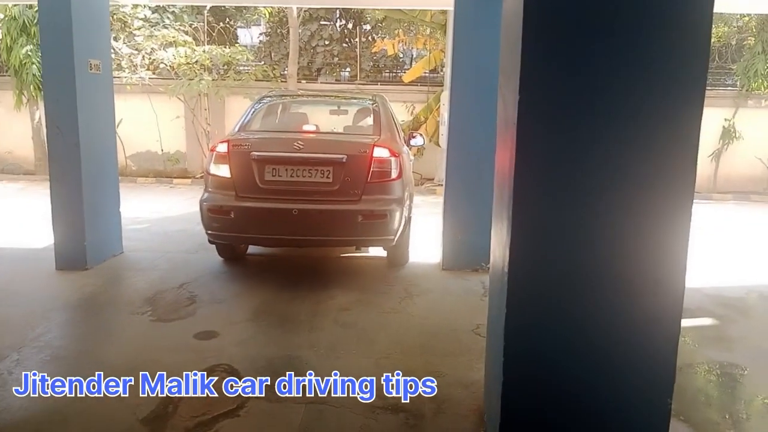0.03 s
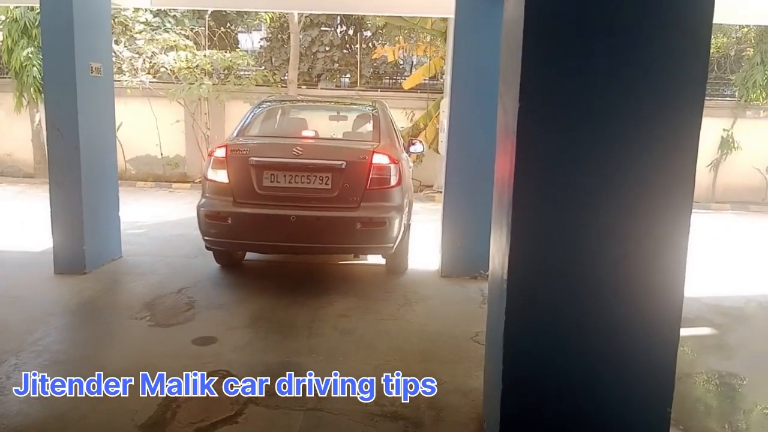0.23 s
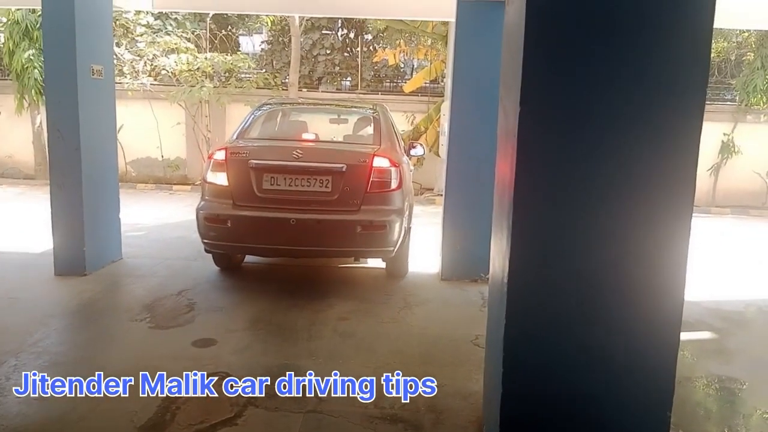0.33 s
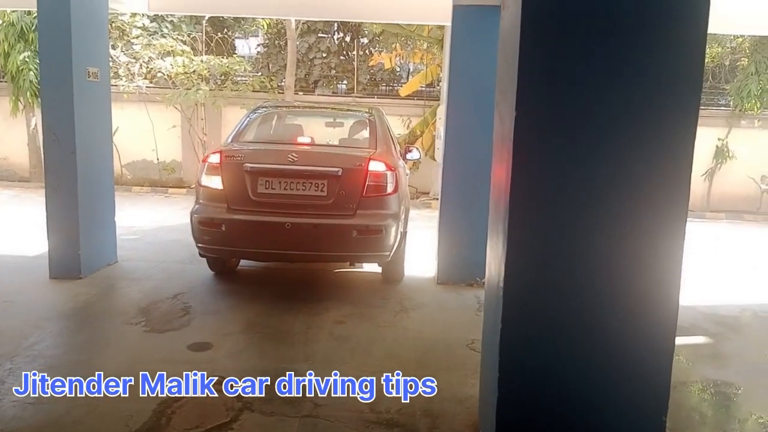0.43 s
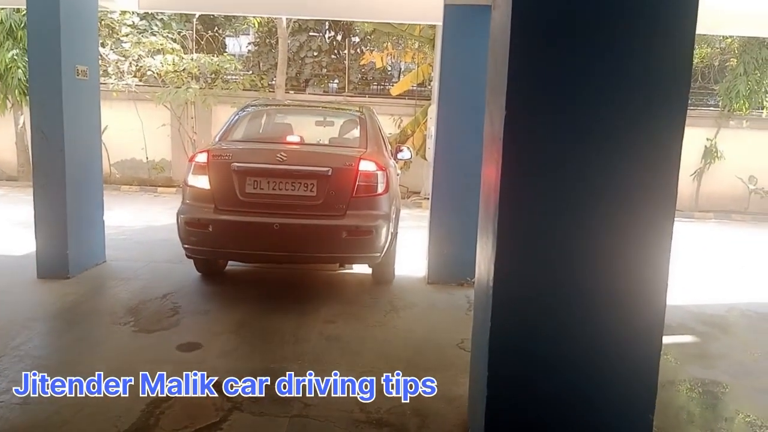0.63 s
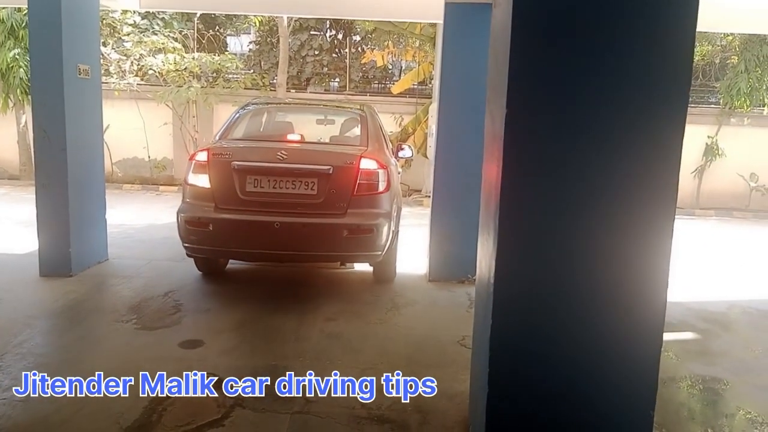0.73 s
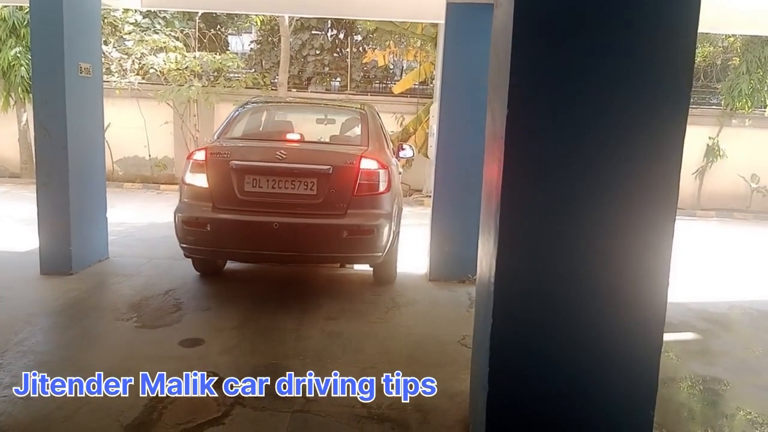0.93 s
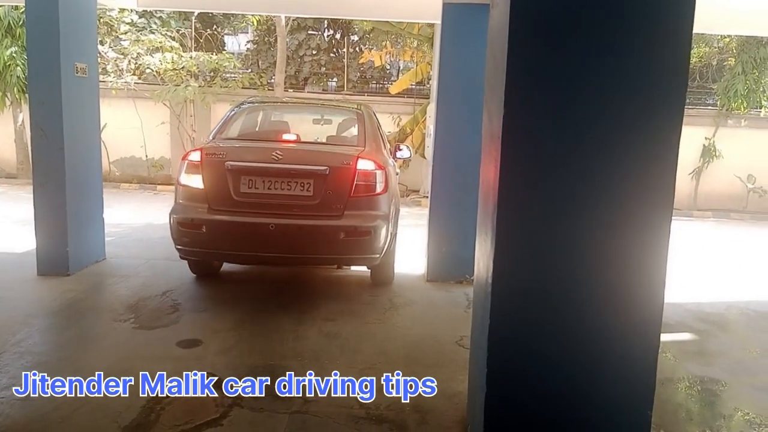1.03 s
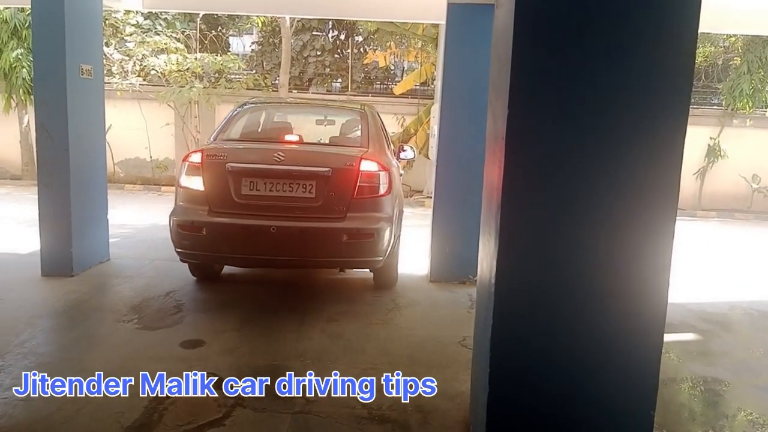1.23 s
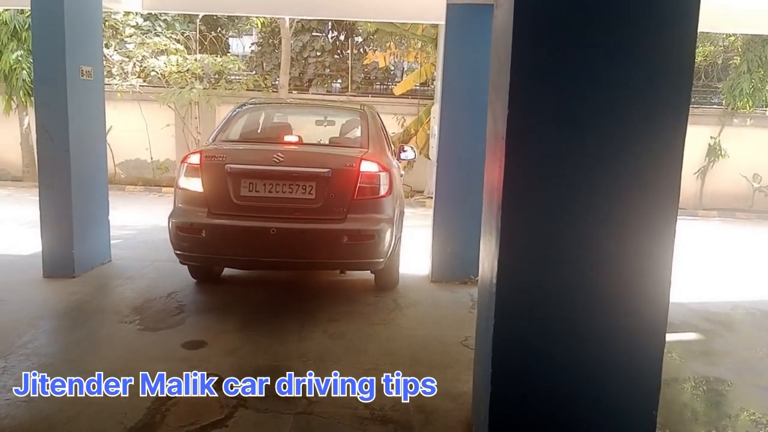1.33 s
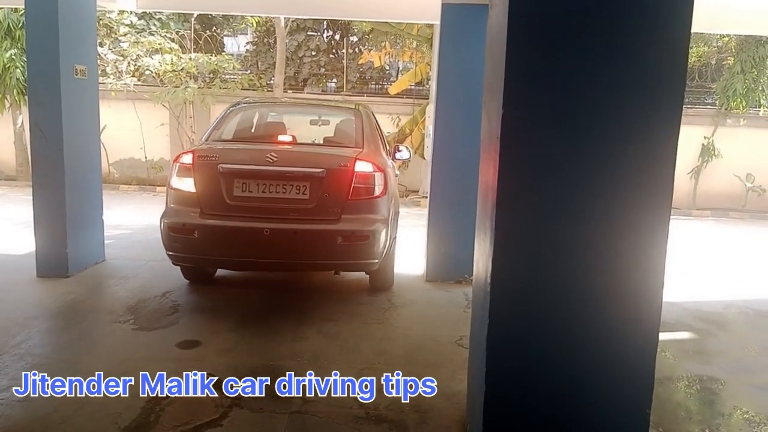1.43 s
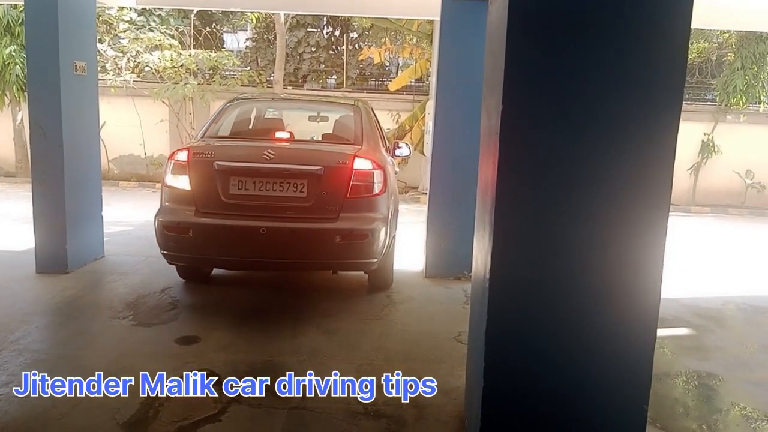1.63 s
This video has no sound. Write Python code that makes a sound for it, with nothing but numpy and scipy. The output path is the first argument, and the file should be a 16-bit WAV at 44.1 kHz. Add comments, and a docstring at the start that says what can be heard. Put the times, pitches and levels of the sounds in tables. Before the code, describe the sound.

A car engine whirrs and hisses, swelling from about 0.2 seconds as the car creeps through a covered parking area. The exhaust booms in bursts on one low note until 0.9 seconds. From 0.5 seconds a fuzzy whine stands out, with faint, brief ringing. Tyres rumble over concrete from about 1 to 1.3 seconds, then everything fades by 1.7 seconds. Short echoes blur the engine throughout.

```python
"""A car creeps through a covered parking area on a touch of throttle.
First the engine's whirr and hiss swell, and the exhaust booms in bursts on one low note.
Then a fuzzy whine stands out and parts ring briefly as the speed and load change.
As the boom dies away the tyres rumble over the concrete, and at last the sound fades.
All along, echoes from the low roof blur the engine."""
import sys
import numpy as np
from scipy import signal
from scipy.fft import rfft, irfft
from scipy.io import wavfile
from scipy.ndimage import uniform_filter1d

SR = 44100
rng = np.random.default_rng(int(sys.argv[2]) if len(sys.argv) > 2 else 0)


def transcribe(signal):
    """Save signal, clipped to [-1, 1], as a 16-bit WAV file at the path in sys.argv[1]."""
    frames = np.atleast_2d(signal).T
    limited = np.clip(frames, -1, 1)
    pcm = np.round(limited * 32767).astype(np.int16)
    wavfile.write(sys.argv[1], SR, pcm)


N = 74970
T = np.arange(N) / SR  # the time of each sample, in seconds

# Levels in the tables are relative: a higher number is louder.
# the exhaust's note (time [s], pitch [Hz])
EXHAUST_PITCH = [(0, 136.4), (.24, 131.8), (.31, 134.7), (.44, 129.6), (.56, 135.5), (.69, 135.8),
                 (.87, 138.1), (1.23, 136.7), (1.7, 134.6)]
# how loudly it booms (time [s], level [dB])
BOOM_LEVEL = [(0, -77), (.09, -74), (.15, -50), (.21, -50), (.236, -33.5), (.27, -61), (.3, -32.5),
              (.325, -33), (.36, -39.5), (.42, -53), (.442, -26.5), (.47, -32.5), (.56, -33), (.69, -32),
              (.715, -42), (.76, -60), (.785, -39.5), (.845, -57), (.87, -38), (.92, -55), (1.05, -60),
              (1.24, -57.5), (1.39, -57), (1.44, -81), (1.5, -64.5), (1.56, -82), (1.7, -78)]
# fainter tones above the note (multiple of the pitch [times], level [dB])
OVERTONES = [(2, -30), (3, -40), (4, -39.5)]
# how loud the engine is (time [s], whirr level [dB], hiss level [dB])
ENGINE_LEVELS = [(0, -66, -75.5), (.14, -61.5, -72.5), (.24, -49.5, -62.5), (.34, -44.5, -54.5),
                 (.38, -47.5, -59), (.46, -42, -60), (.62, -42, -56.5), (.7, -41.5, -55.5),
                 (.75, -45.5, -62), (1.1, -47, -59), (1.35, -49, -62), (1.62, -51, -62.5),
                 (1.7, -55.5, -65.5)]
# the whirr's colour, or mix of low and high, in three states (frequency [Hz], level [dB])
IDLE_COLOUR = [(40, -14), (200, -18), (450, -43), (780, -8), (980, -5.5), (1120, -5.5), (1600, -3.5),
               (2150, 0), (2550, -13), (3000, -18.5), (3400, -18.5), (3700, -23), (4500, -40), (4900, -47)]
LOADED_COLOUR = [(40, -9), (200, -41), (450, -45.5), (780, -20), (960, 1.5), (1100, -9), (1450, -4),
                 (2150, 2), (2450, -4.5), (3300, -8.5), (3600, -11.5), (4000, -15), (4550, -32),
                 (4900, -66)]
COASTING_COLOUR = [(40, -22), (200, -14.5), (450, -20.5), (780, -7.5), (960, -7.5), (1100, -2), (1450, 1),
                   (2150, 4), (2550, -10.5), (3300, -14), (3600, -12), (4000, -23.5), (4500, -26.5),
                   (4900, -60)]
# when the engine takes up the load, and when it eases off (start [s], end [s])
LOAD_TIMES = [0.26, 0.31]
COAST_TIMES = [0.64, 1.354]
# ringing that swells and fades with the whirr (pitch [Hz], width [Hz], level [dB])
ENGINE_RINGS = [(918, 46, -18), (1000, 13.6, -16.5), (1705, 120, -12.5), (1994, 60, -10.5),
                (2098, 10, -11.5), (2150, 36, -23.5), (2300, 54, -15)]
# colours of the hiss and of its extra spit on open throttle (frequency [Hz], level [dB])
HISS_COLOUR = [(4000, -27), (4900, -34), (5600, -15), (6000, -8.5), (6900, -0.5), (8000, 0), (9000, -0.5),
               (9500, -28.5), (11000, -34), (15500, -35)]
SPIT_COLOUR = [(3500, -35), (4500, 6), (4850, -21), (5500, 7), (8800, 9), (9700, -14), (11500, -21.5),
               (13000, -18.5), (15500, -18.5)]
# how loud the spit is (time [s], level [dB])
SPIT_LEVEL = [(0, -97), (.22, -76.5), (.4, -56.5), (.56, -54.5), (.72, -58.5), (1, -66), (1.7, -100)]
# the whine's two tones (pitch [Hz], width of the waver [Hz], level [dB])
WHINE_TONES = [(1179.6, 36.8, -5.5), (1230.6, 60.4, 0)]
# how loud the whine is (time [s], level [dB])
WHINE_LEVEL = [(0, -76), (.18, -71), (.27, -58), (.44, -56.5), (.55, -41), (.66, -47), (.74, -49),
               (.85, -54), (.9, -44), (1.04, -47.5), (1.15, -45), (1.26, -50.5), (1.35, -48), (1.44, -46.5),
               (1.5, -51), (1.58, -70), (1.7, -57)]
# parts that ring briefly (start [s], length [s], pitch [Hz], width of the waver [Hz], level [dB])
RINGING_PARTS = [(0.41, 0.14, 287, 15.6, -48), (0.49, .16, 528, 24, -50), (.5, 0.15, 707.4, 20, -54.5),
                 (0.538, .15, 940, 27, -52.5), (0.545, 0.13, 2684, 16, -53), (0.51, .36, 3050, 4, -56.5),
                 (0.73, 0.59, 2780, 41, -58.5), (0.92, 0.41, 605, 50, -50), (0.956, 0.19, 985, 20.7, -52),
                 (1.04, 0.34, 366, 14.8, -53.5), (1.362, 0.23, 3258, 14.7, -64.5)]
# how loud the rumble is (time [s], bass level [dB], low middle level [dB], upper level [dB])
RUMBLE_LEVELS = [(0, -92, -82.5, -69.5), (.12, -69, -75.5, -71.5), (.24, -53.5, -77, -76.5),
                 (.33, -45, -49, -65.5), (.4, -59, -48.5, -59), (.46, -53, -43, -54.5),
                 (.56, -44, -46, -49), (.65, -52, -52, -55.5), (.7, -59, -53.5, -77), (.83, -53, -67, -77),
                 (.93, -47.5, -53, -77), (.97, -44, -40, -41.5), (1.13, -49, -41, -42.5),
                 (1.18, -48, -49, -49.5), (1.29, -48, -47, -50), (1.37, -57.5, -52, -70.5),
                 (1.44, -71, -68.5, -76), (1.5, -77, -58.5, -75), (1.57, -71, -75, -67),
                 (1.7, -98, -79, -74)]
# colours of those three layers of rumble (frequency [Hz], level [dB])
BASS_COLOUR = [(20, -30.5), (38, -28), (56, -7), (72, 2), (92, 3), (115, -2.5), (150, -32), (400, -78)]
LOW_MIDDLE_COLOUR = [(60, -36), (118, 2.5), (150, 5.5), (200, 3), (250, 2), (310, -6), (342, -2), (400, -9),
                     (600, -15.5), (2000, -81)]
UPPER_COLOUR = [(300, -30), (460, -2), (540, -1.5), (605, 0.5), (710, -1.5), (820, -1.5), (1000, -5.5),
                (1500, -12.5), (2500, -37), (5000, -73)]
# dips and one slight lift from the car body and floor (frequency [Hz], width [Hz], change [dB])
BODY_DIPS = [(1462, 37, -1.5), (2537, 48, -0.5), (3100, 190, 0.5), (3550, 87, -12), (4350, 86, -3.5),
             (4700, 100, -3), (6000, 160, -5.5)]
# the balance between the layers (layer name, change in level [dB])
TRIM_DB = {"boom": -1, "whirr": -0.96, "hiss": -2, "whine": -3, "bass": -3, "low middle": 0, "upper": -3}


def exhaust():
    """The pipe booms on a nearly pure low note with weak, unsteady overtones."""
    waver, swell_s = .008, 0.0088  # the pipe needs a moment to build up or lose its note
    pitch = curve(EXHAUST_PITCH) * (1 + waver * drift(20))
    angle = phase(pitch)
    note = np.sin(angle)
    for multiple, db in OVERTONES:
        strength = amp(db) * (1 + 0.87 * drift(17))
        note += strength * np.sin(multiple * angle + 2 * np.pi * rng.random())
    level = amp(curve(BOOM_LEVEL) + TRIM_DB["boom"])
    smooth_level = uniform_filter1d(level, round(swell_s * SR))
    shake = amp(0.5 * drift(20))
    return unit(note) * smooth_level * shake


def engine():
    """The engine whirrs, rings and hisses as it idles, takes up the load and then coasts."""
    throb = 1 + 0.063 * np.cos(phase(curve(EXHAUST_PITCH) / 5))  # once per five waves of the note
    load = np.interp(T, LOAD_TIMES, [0, 1])
    coast = np.interp(T, COAST_TIMES, [0, 1])
    states = [(1 - load, IDLE_COLOUR), (load * (1 - coast), LOADED_COLOUR), (coast, COASTING_COLOUR)]
    whirr = sum(np.sqrt(share) * noise(colour, patch_db=3.5) for share, colour in states)
    whirr = (whirr + engine_rings()) * amp(curve(ENGINE_LEVELS) + TRIM_DB["whirr"])
    hiss = noise(HISS_COLOUR, patch_db=2.7) * amp(curve(ENGINE_LEVELS, column=2) + TRIM_DB["hiss"])
    spit = noise(SPIT_COLOUR, patch_db=2.5) * amp(curve(SPIT_LEVEL))
    return throb * (whirr + hiss + spit)


def engine_rings():
    """Noise keeps the engine ringing at a few pitches; a wider ring sounds rougher."""
    rings = np.zeros(N)
    for hz, width, db in ENGINE_RINGS:
        angle = 2 * np.pi * hz * T
        ring = drift(width / 2) * np.cos(angle) + drift(width / 2) * np.sin(angle)
        rings += amp(db) * unit(ring)
    return rings


def whine():
    """Two close, wavering tones beat against each other, as from a belt or pump."""
    pair = np.zeros(N)
    for hz, width, db in WHINE_TONES:
        flutter_db = 2.4 * drift(29)
        pitch = hz + width / 2 * drift(26.1)
        pair += amp(db + flutter_db) * np.sin(phase(pitch))
    return unit(pair) * amp(curve(WHINE_LEVEL) + TRIM_DB["whine"])


def ringing_parts():
    """As speed and load change, each part swells into a wavering tone and dies away."""
    parts = np.zeros(N)
    for start, length, hz, width, db in RINGING_PARTS:
        progress = np.clip((T - start) / length, 0, 1)
        swell = np.sqrt(abs(np.sin(np.pi * progress)))
        pitch = hz + width / 2 * drift(38.1)
        flutter_db = 2.8 * drift(25)
        parts += amp(db + flutter_db) * swell * np.sin(phase(pitch))
    return parts


def rumble():
    """The engine and the tyres on concrete make a low roar, in three layers of noise."""
    bass = amp(curve(RUMBLE_LEVELS) + TRIM_DB["bass"])
    low_middle = amp(curve(RUMBLE_LEVELS, column=2) + TRIM_DB["low middle"])
    upper = amp(curve(RUMBLE_LEVELS, column=3) + TRIM_DB["upper"])
    return (bass * noise(BASS_COLOUR, patch_db=2.0)
            + low_middle * noise(LOW_MIDDLE_COLOUR, patch_db=1.9)
            + upper * noise(UPPER_COLOUR, patch_db=5.5))


def body_and_floor(sound):
    """The car body and floor hollow out a sound by weakening a few frequencies."""
    freqs = np.fft.rfftfreq(N, 1 / SR)
    change_db = sum(db * np.exp(-((freqs - hz) / width) ** 2) for hz, width, db in BODY_DIPS)
    return irfft(rfft(sound) * amp(change_db), N)


def roof_echoes(sound, delay_s=.008, fade_s=0.39, level_db=-10.5):
    """The low roof and pillars throw back a blur of echoes that falls 60 dB in fade_s."""
    tail = rng.standard_normal(N) * amp(-60 * T / fade_s) * (T > delay_s)
    return amp(level_db) * signal.fftconvolve(sound, tail / np.linalg.norm(tail))[:N]


def noise(colour, patch_db):
    """Noise of a given colour, with short louder and softer patches at random frequencies."""
    _, _, grid = signal.stft(rng.standard_normal(N), SR, nperseg=1024, noverlap=768)
    patches = uniform_filter1d(rng.standard_normal(grid.shape), size=9, axis=0)  # blur in frequency
    patches = unit(uniform_filter1d(patches, size=7, axis=1))  # blur in time
    patchy = signal.istft(grid * amp(patch_db * patches), SR, nperseg=1024, noverlap=768)[1][:N]
    hz, db = np.transpose(colour)
    freqs = np.fft.rfftfreq(N, 1 / SR)
    colour_db = np.interp(np.log(freqs + 1), np.log(hz), db)
    return unit(irfft(rfft(patchy) * amp(colour_db), N))


def drift(hz):
    """A smooth random wobble, up to about hz times a second."""
    freqs = np.fft.rfftfreq(N, 1 / SR)
    return unit(irfft(rfft(rng.standard_normal(N)) / (1 + (freqs / hz) ** 4), N))


def curve(table, column=1):
    """Joins the points of a time table with straight lines, one value per sample."""
    rows = np.array(table)
    return np.interp(T, rows[:, 0], rows[:, column])


def phase(pitch):
    """The angle a wave has turned through so far, given its changing pitch in Hz."""
    return 2 * np.pi * np.cumsum(pitch) / SR


def amp(db):
    """Turns decibels into a number to multiply a sound by."""
    return 10 ** (np.asarray(db) / 20)


def unit(x):
    """Scales a signal to an average power of 1."""
    return x / np.sqrt(np.mean(x ** 2) + 1e-20)


def scene():
    """The car between floor and roof, in one channel."""
    motor = body_and_floor(engine()) + whine() + ringing_parts()
    return (exhaust() + rumble() + motor + roof_echoes(motor))[None]


def record(dry, cutoff_hz=15500):
    """Takes away the very highest treble."""
    treble_cut = signal.firwin(511, cutoff_hz, window=("kaiser", 9), fs=SR)
    return signal.oaconvolve(dry, treble_cut[None], "same")


dry = scene()
out = record(dry)
transcribe(out)
```